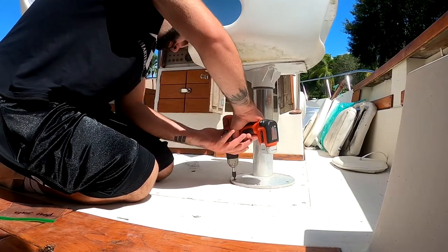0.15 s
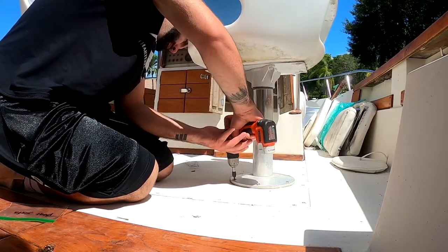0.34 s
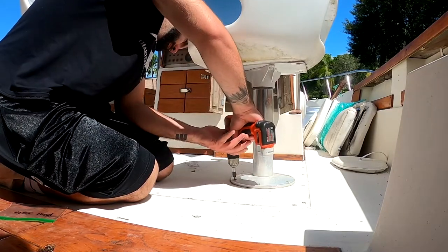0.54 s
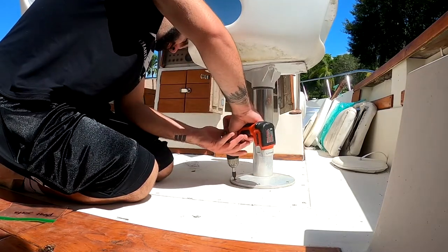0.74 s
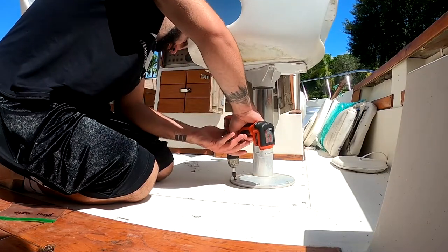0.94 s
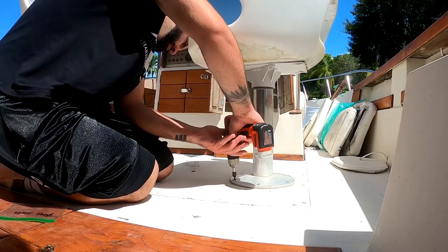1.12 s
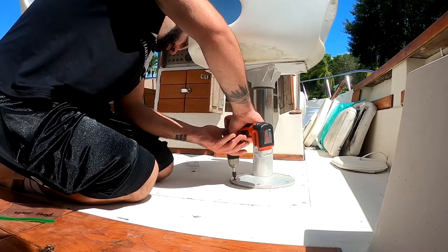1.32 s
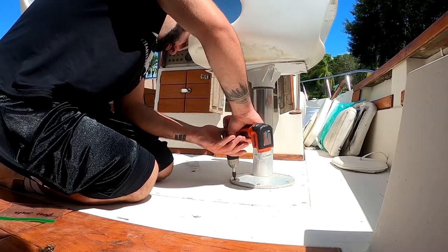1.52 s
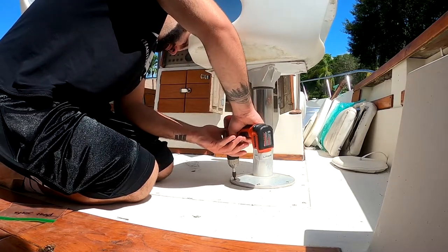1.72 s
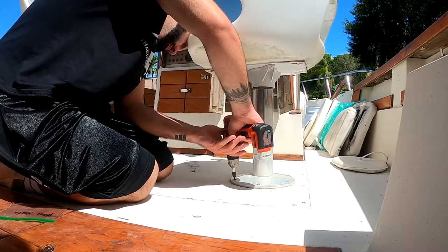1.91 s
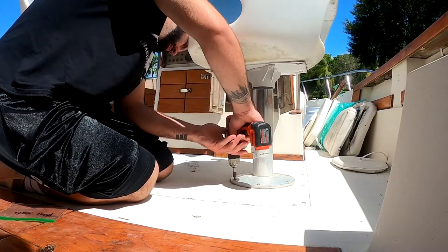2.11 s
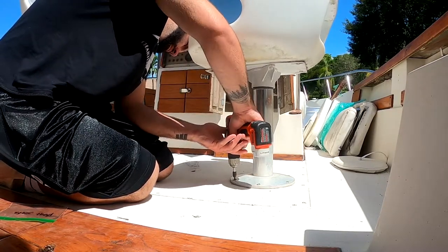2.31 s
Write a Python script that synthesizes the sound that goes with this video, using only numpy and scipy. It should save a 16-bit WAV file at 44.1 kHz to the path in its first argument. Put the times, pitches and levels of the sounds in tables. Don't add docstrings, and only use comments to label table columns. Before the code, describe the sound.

Two harsh, rattling bursts of a cordless drill driving screws, with a low hum from the hollow deck.

```python
import sys
import numpy as np
from scipy import signal
from scipy.fft import rfft, irfft, next_fast_len
from scipy.io import wavfile
from scipy.ndimage import uniform_filter1d, map_coordinates

SR = 44100
rng = np.random.default_rng(int(sys.argv[2]) if len(sys.argv) > 2 else 0)


def waveform_to_disk(signal):
    frames = np.transpose(np.atleast_2d(signal))
    scaled = np.clip(frames, -1, 1) * 32767
    samples = np.round(scaled).astype(np.int16)
    wavfile.write(sys.argv[1], SR, samples)


def gain_from_decibels(decibels):
    exponent = np.asarray(decibels, float) / 20
    return 10 ** exponent


N = 103635


def unit(x):
    return x / np.sqrt(np.mean(x ** 2) + 1e-20)


def along(points, hz):
    f, v = np.transpose(points)
    return np.interp(np.log(hz + 1), np.log(f + 1), v)


def wobble(rate):
    knots = rng.standard_normal(int(N * rate / SR) + 4)
    return map_coordinates(knots, [np.arange(N) * rate / SR])


def filtered(x, response):
    m = next_fast_len(N + SR // 2)
    return irfft(rfft(x, m) * response(np.fft.rfftfreq(m, 1 / SR)), m)[..., :N]


def resonance(f, centre, width):
    return 1j * f * width / (centre ** 2 - f ** 2 + 1j * f * width)


# time in seconds, level in dB, load on the bit in dB,
# pressure on the deck in dB; one table a burst.
BURST_TABLES = [
    [(.16, -50, 7, 6.5), (.2, -38.5, -1, -5.5), (.262, -18.5, -12, -4.5), (.36, -21.5, 3.5, 1),
     (.45, -22, 2, 2.5), (.54, -21.5, -3, 0.5), (.568, -27, -5, 5), (.592, -28.5, 2.5, 12),
     (.604, -53, -12, 7)],
    [(.78, -37, 2.5, -10), (.822, -25.5, -11.5, -1), (.93, -22.5, -10.5, 2.5), (1.05, -23, -3, 0.5),
     (1.3, -22, 0, 0), (1.8, -22.5, 3.5, 0), (1.995, -22, 4.5, 0), (2.04, -29.5, -2, 13),
     (2.07, -42, 1, 17.5)],
]
# time in seconds, hard slips per second; one table a burst.
SPEED_TABLES = [
    [(0.16, 36.1), (0.27, 44.0), (0.354, 52.4), (0.394, 55.8), (0.434, 58.7), (0.452, 59.4), (0.6, 59.2)],
    [(0.78, 42.4), (0.868, 49.1), (1.0, 59.9), (1.234, 62.5), (1.81, 62.8), (1.944, 62.5), (2.065, 58.5)],
]
# the time of one hard slip in each burst, in seconds.
HARD_SLIP_S = [.468, 1.54]


def motion():
    t, count, gains = np.arange(N) / SR, np.zeros(N), np.zeros((3, N))
    for speed, rows, hard_s in zip(SPEED_TABLES, BURST_TABLES, HARD_SLIP_S):
        s, *dbs = np.transpose(rows)
        on = (t >= s[0]) & (t < s[-1])
        run = np.cumsum(np.interp(t, *np.transpose(speed))) / SR
        count = np.where(on, run - run[round(hard_s * SR)], count)
        gains = np.where(on, gain_from_decibels([np.interp(t, s, db) for db in dbs]), gains)
    gain, load, pressure = gains
    return count, uniform_filter1d(gain, size=200), load, pressure


# frequency in Hz, level in dB per Hz.
HOUSING_TILT = [(290, -19.5), (500, -4.5), (759, -7), (1200, -4), (1930, -4), (3800, -10), (7700, -19),
                (8890, -19), (15600, -45)]
# frequency in Hz, width in Hz, level in dB (not used, all ring alike).
HOUSING_MODES = [(1328, 53, 0), (2257, 53, -8), (2550, 68, -7), (3806, 130, -8), (4343, 37, -11),
                 (5240, 50, -13), (5640, 240, -12), (6170, 89, -15), (8500, 130, -22)]
# frequency in Hz, width in Hz, level in dB.
HOUSING_EXTRAS = [(1030, 23, 7.5), (740, 40, -21), (7850, 1060, -5)]


def housing(f):
    mode_db = 5
    bump = lambda centre, width: 1 / (1 + (2 * (f - centre) / width) ** 2)
    db = sum(mode_db * bump(centre, width) for centre, width, _ in HOUSING_MODES)
    db = db + sum(level * bump(centre, width) for centre, width, level in HOUSING_EXTRAS)
    return gain_from_decibels(along(HOUSING_TILT, f) + db)


def through_housing(x, on):
    y = filtered(x, housing)
    return y / np.sqrt(np.mean(y[:, on] ** 2))


def impact_brightness(f):
    return gain_from_decibels(2.5 * np.log2((f + 200) / 2000))


def impact_envelope(impulses, decay_s):
    rise_s = .0004
    lag = lambda x, s: signal.lfilter([1], [1, -np.exp(-1 / (s * SR + .1))], x)
    return lag(lag(impulses, decay_s), rise_s) / (rise_s * SR + 1)


# level in dB, for the hard, soft and middle slip.
SLIP_SIZE_DB = [4.5, -13, 1.5]
# frequency in Hz, width in Hz, level in dB.
BIT_RING = (1161, 380, -10)


def slip_impulses(count, gain):
    alternate_db, scatter_db, jitter = 2.5, 2.2, .04
    step = np.floor(3 * count).astype(int)
    at = np.flatnonzero((np.diff(step) == 1) & (gain[1:] > 0))
    k = step[at + 1]
    draw = rng.standard_normal((600, 2))[:len(at)]
    shifted = np.clip(at + (jitter * draw[:, 0] * SR / 190).astype(int), 0, N - 1)
    alternate = alternate_db * (-1.) ** (k // 3)
    impulses = np.zeros(N)
    impulses[shifted] = gain_from_decibels(np.array(SLIP_SIZE_DB)[k % 3] + alternate + scatter_db * draw[:, 1])
    return impulses


def clutch(count, gain, load):
    clack_db, skid_db, gear_db = -0.5, -3, -4.5
    impulses = slip_impulses(count, gain)
    shape = impact_envelope(impulses, .0022) + gain_from_decibels(skid_db) * impact_envelope(impulses, .0087)
    on = gain > gain.max() / 4
    shape = gain_from_decibels(clack_db) * shape / np.sqrt(np.mean(shape[on] ** 2))
    bite = np.clip(2 * gain / gain.max(), 0, 1) ** 0.82
    clacks = filtered(bite * shape * rng.standard_normal((2, N)), impact_brightness)
    gears = gain_from_decibels(gear_db + 1.8 * wobble(31.84)) * rng.standard_normal((2, N))
    noise = clacks + gears
    hz, width, ring_db = BIT_RING
    ring = filtered(noise, lambda f: resonance(f, hz, width) ** 2)
    return gain * (through_housing(noise, on) + gain_from_decibels(ring_db) * load * unit(ring))


# frequency in Hz, width in Hz, level in dB.
DECK_MODES = [(146, 60, 3), (252, 120, -37.5), (329, 103, -7.5), (441.7, 48, -10), (613, 440, -17)]


def deck(f):
    modes = enumerate(DECK_MODES)
    return sum((-1) ** k * gain_from_decibels(db) * resonance(f, hz, width) for k, (hz, width, db) in modes)


# multiple of the hard-slip rate, level in dB.
HUM_ORDERS = [(1, -29.5), (2, -2), (3, -5.5), (4, -15.5), (5, -9.5), (6, -12.5), (7, -11), (8, -22.5),
              (9, -23.5), (10, -16.5), (11, -20.5)]
# frequency in Hz, level in dB re the hum, sway in dB.
PANEL_TONE = (146, -4, 2.5)
# frequency in Hz, level in dB per Hz.
DECK_RUMBLE = [(18, -61.5), (30, -31), (134, 2), (196, -10), (236, -11), (429, -13), (547, -15.5),
               (900, -19.5), (1170, -45), (1980, -120)]


def hum(count, gain, pressure):
    full_speed_hz, sway_db, hum_db, rumble_db = 62.7, .8, 3, -0.5
    upper = np.minimum(pressure, gain_from_decibels(2.5))
    push = np.zeros(N)
    for k, db in HUM_ORDERS:
        size = gain_from_decibels(db + sway_db * wobble(10)) / abs(deck(k * full_speed_hz))
        phase = 2 * np.pi * (k * count + 0.0067 * wobble(20))
        push -= (pressure if k < 4 else upper) * size * np.cos(phase)
    turn = .15 * np.cos(2 * np.pi * (count / 3 + 0.09 * wobble(3.5)))
    pair = .15 * wobble(3) * np.cos(np.pi * count)
    push *= 1 + turn + pair + .06 * wobble(59.76)
    hz, db, panel_sway_db = PANEL_TONE
    size = gain_from_decibels(db + panel_sway_db * wobble(10)) / abs(deck(hz))
    push += pressure * size * np.sin(2 * np.pi * (hz * np.arange(N) / SR + .2 * wobble(8)))
    thumps = filtered(gain * push, deck) * [[1], [.3]]
    loose = unit(filtered(rng.standard_normal((2, N)), lambda f: gain_from_decibels(along(DECK_RUMBLE, f))))
    return gain_from_decibels(hum_db) * thumps + gain_from_decibels(rumble_db) * gain * upper * loose


# frequency in Hz, width in Hz, level in dB.
HULL_MODES = [(138, 6.9, -11.5), (175, 9, -16.5), (254, 8, -14.5)]


def hull(f):
    return 1 + sum(gain_from_decibels(db) * resonance(f, hz, width) for hz, width, db in HULL_MODES)


# time in seconds, peak level in dB.
HEAVY_SLIPS = [
    (0.2447, -17),
    (0.2605, -6.5),
    (0.2864, -14.5),
    (0.5497, -17),
    (0.5801, -16.5),
    (0.8169, -13.5),
    (0.846, -19),
    (0.8688, -9),
    (2.0241, -9),
    (2.0462, -16),
]


def heavy_slips():
    impulses = np.zeros(N)
    for s, db in HEAVY_SLIPS:
        impulses[round(s * SR)] = gain_from_decibels(db - 5.5)
    noise = rng.standard_normal((2, N))
    bright = lambda f: housing(f) * impact_brightness(f)
    shaped = noise * impact_envelope(impulses, 0.0037)
    return filtered(shaped, bright) / np.std(filtered(noise, bright))


# time in seconds, peak level in dB, brightness in Hz.
TICK_EVENTS = [
    (0.097, -50, 4800),
    (.118, -50.5, 5000),
    (0.1554, -53.5, 7000),
    (.167, -53, 5000),
    (.745, -58, 3500),
    (0.7564, -45, 5900),
    (.765, -41.5, 10000),
    (.7826, -37, 6000),
]


def ticks():
    out, t = np.zeros((2, N + SR)), np.arange(2000) / SR
    for s, db, hz in TICK_EVENTS:
        band = [1200, np.clip(hz, 1600, 15000)]
        sos = signal.butter(3, band, "bandpass", fs=SR, output="sos")
        noise = rng.standard_normal((2, len(t))) * np.exp(-t / .004)
        out[:, round(s * SR):][:, :len(t)] += gain_from_decibels(db + 4.5) * signal.sosfilt(sos, noise)
    return out[:, :N]


# start in seconds, end in seconds, frequency in Hz, rms level in dB.
WHINE_TONE = (.183, .225, 3871, -33.5)


def whine():
    start_s, end_s, hz, db = WHINE_TONE
    t = np.arange(N) / SR
    gate = np.clip((t - start_s) / .003, 0, 1) * np.clip((end_s - t) / .006, 0, 1)
    return gain_from_decibels(db + 3 + wobble(60)) * gate * np.sin(2 * np.pi * hz * t) * [[1], [0]]


# frequency in Hz, time to fall 60 dB in seconds.
ECHO_T60 = [(100, 0.42), (250, 0.28), (600, 0.23), (2000, 0.17), (6000, 0.18), (12000, .15)]


def echo(x):
    out, hop = np.zeros((2, N + SR)), 4096
    for i in range(0, N, hop):
        hz, t, z = signal.stft(rng.standard_normal((2, SR // 3)), SR, nperseg=256)
        decay = gain_from_decibels(-60 * t / along(ECHO_T60, hz)[:, None])
        energy = (decay ** 2).sum(1, keepdims=True) * 128
        tail = signal.istft(z * decay / np.sqrt(energy), SR, nperseg=256)[1]
        piece = x[:, i:i + 2 * hop]
        window = np.sin(np.pi * np.arange(piece.shape[1]) / (2 * hop))
        wet = signal.fftconvolve(piece * window, tail, axes=1)
        out[:, i + 300:][:, :wet.shape[1]] += wet
    return out[:, :N]


# frequency in Hz, correlation from 0 to 1.
CHANNEL_LIKENESS = [(60, 0.99), (180, 0.92), (550, 0.78), (1650, 0.64), (4970, 0.61), (15000, 0.43)]
# frequency in Hz, left over right in dB.
LEFT_OVER_RIGHT = [(60, -2.5), (180, 2.5), (550, 0), (1650, 3), (4970, 2.5), (15000, -5.5)]


def cockpit(tool, low):
    echo_db, hum_wet, lag_s = -10, .5, 4.5e-5
    heard = tool + low + gain_from_decibels(echo_db) * echo(tool + hum_wet * low)
    angle = lambda f: np.arccos(np.clip(along(CHANNEL_LIKENESS, f), 0, 1)) / 2
    shared, apart = filtered(heard, lambda f: np.array([np.cos(angle(f)), np.sin(angle(f))]))
    side = np.array([[1], [-1]])
    balance = lambda f: gain_from_decibels(side * along(LEFT_OVER_RIGHT, f) / 2)
    delay = lambda f: np.exp(-1j * np.pi * f * lag_s * side)
    return filtered(np.array([shared + apart, shared - apart]), lambda f: balance(f) * delay(f))


# frequency in Hz, level in dB per Hz.
HARBOUR_SPECTRUM = [(15, -51), (25, -30.5), (49, 3.5), (131, -1.5), (529, -22.5), (673, -36), (1240, -31),
                    (1720, -44), (15000, -52.5)]
# time in seconds, level in dB.
LAPPING_LEVEL = [(0, -63.5), (0.139, -58), (0.702, -68), (2.35, -84)]


def harbour():
    noise = rng.standard_normal((3, N))
    floor = lambda f: gain_from_decibels(along(HARBOUR_SPECTRUM, f)) / (1 + (f / 7000) ** 2)
    low = unit(filtered(noise[0] + noise[1:], floor))
    water = lambda f: 1 / (1 + ((f - 1050) / 300) ** 2) + 0.18 / (1 + (f / 4000) ** 4)
    lap = unit(filtered(rng.standard_normal((2, N)), water))
    lap_db = np.interp(np.arange(N) / SR, *np.transpose(LAPPING_LEVEL)) + 3 * wobble(56)
    return gain_from_decibels(-42 + 0.83 * wobble(12)) * low + gain_from_decibels(lap_db) * lap


def scene():
    count, gain, load, pressure = motion()
    tool = clutch(count, gain, load) + ticks() + heavy_slips() + whine()
    low = filtered(hum(count, gain, pressure), hull)
    return cockpit(tool, low) + harbour()


def band_limit(x):
    return signal.sosfilt(signal.butter(12, 15730, fs=SR, output="sos"), x)


def record(dry):
    ceiling, top_hz = .68, 15740
    held = dry / (1 + np.abs(dry / ceiling) ** 4) ** (1 / 4)
    return band_limit(filtered(held, lambda f: f < top_hz))


dry = scene()
out = record(dry)
waveform_to_disk(out)
```